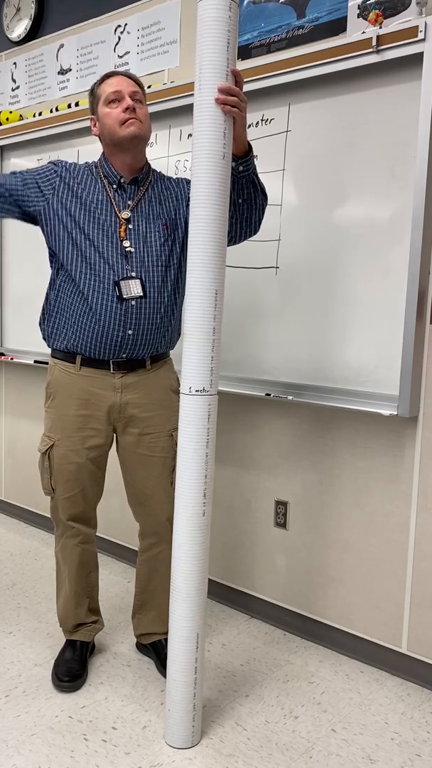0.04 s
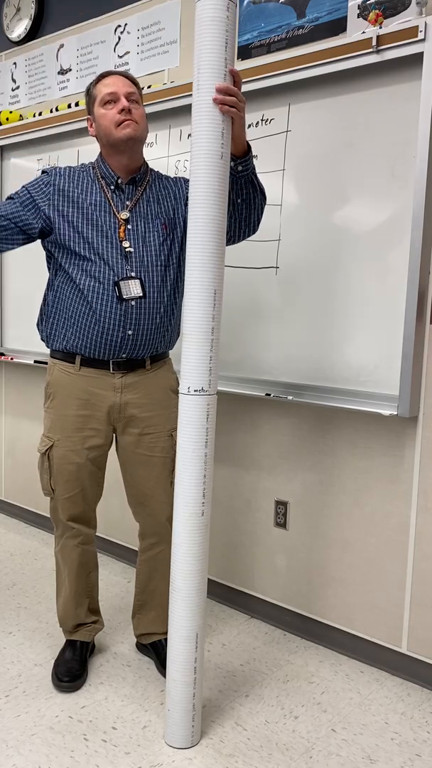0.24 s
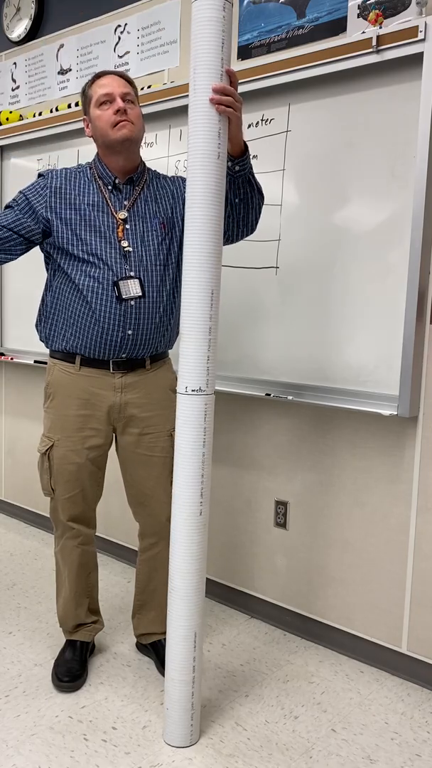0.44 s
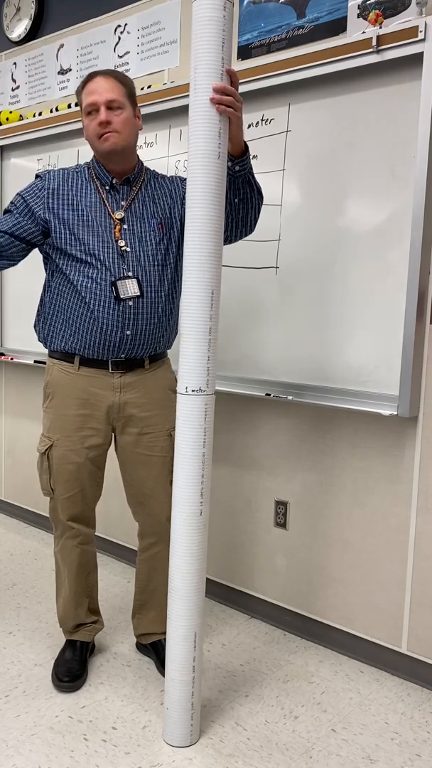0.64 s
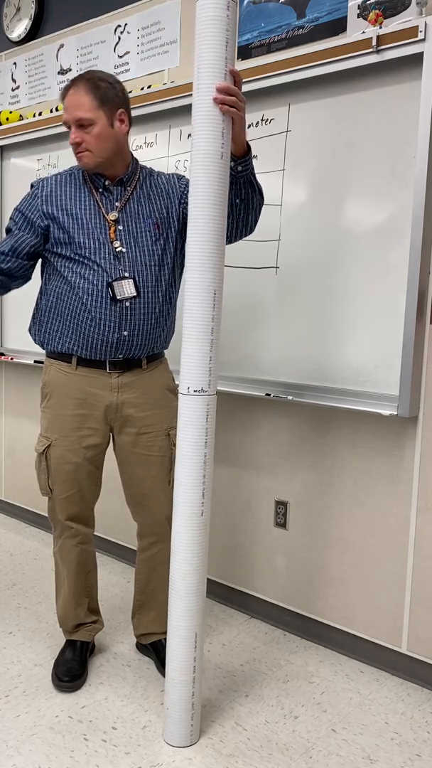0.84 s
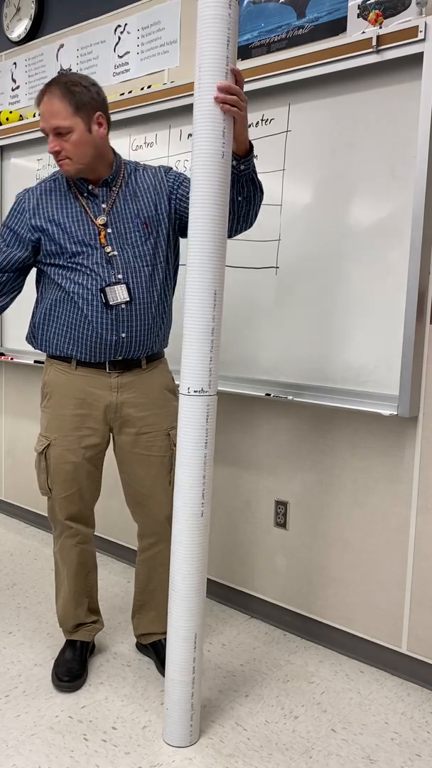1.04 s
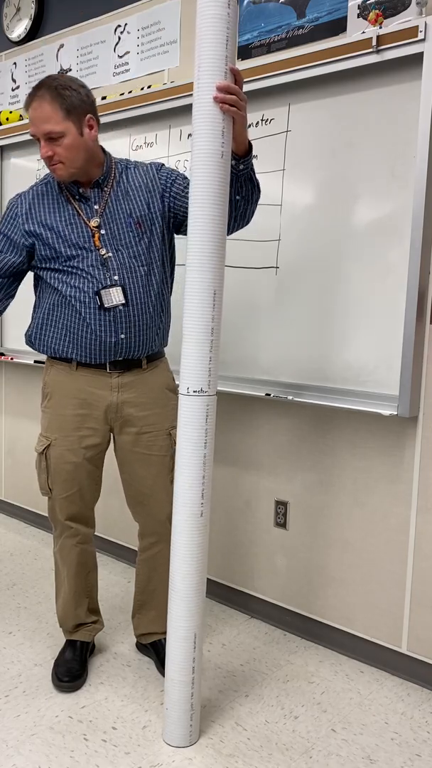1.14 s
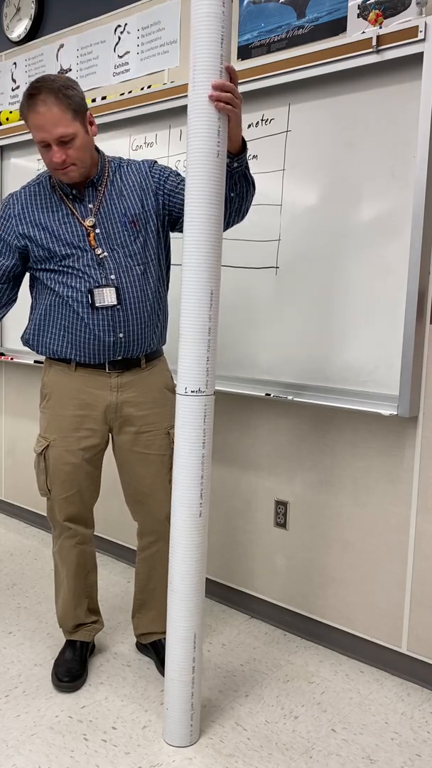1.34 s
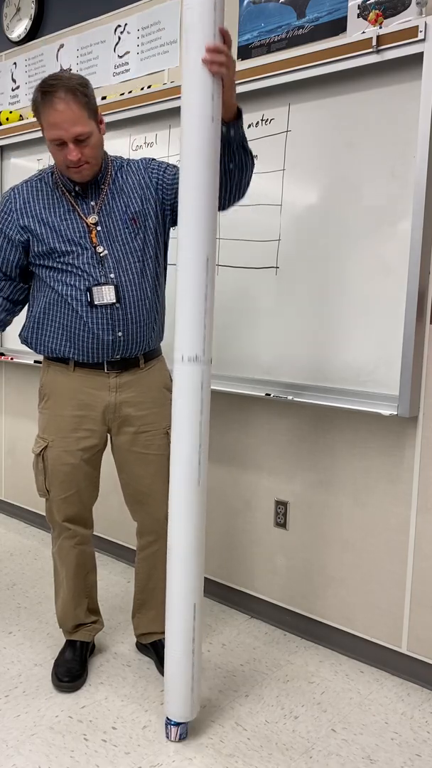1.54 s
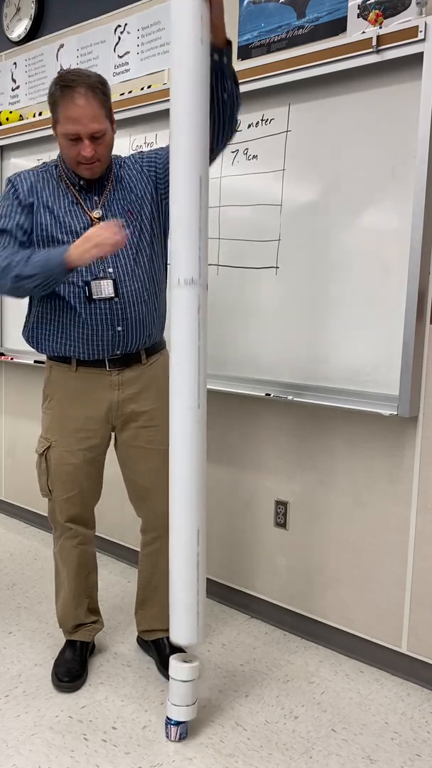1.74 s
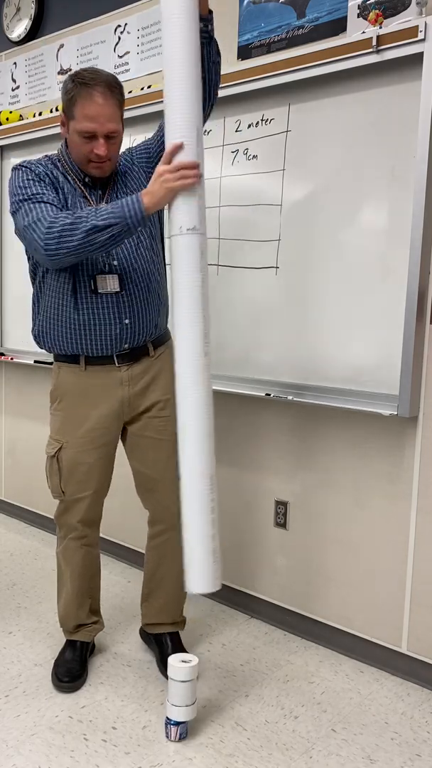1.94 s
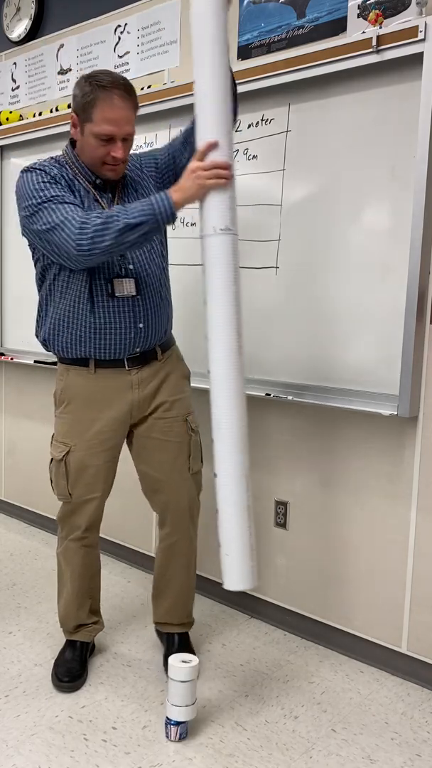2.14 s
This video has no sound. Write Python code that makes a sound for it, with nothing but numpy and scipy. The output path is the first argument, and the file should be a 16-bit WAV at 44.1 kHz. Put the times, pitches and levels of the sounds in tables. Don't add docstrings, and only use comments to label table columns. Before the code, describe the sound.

Loud crunching slam on an aluminium can after a weight's quick rattling slide down a pipe.

```python
import sys
import numpy as np
from scipy import signal
from scipy.fft import rfft, irfft, next_fast_len
from scipy.io import wavfile
from scipy.ndimage import uniform_filter1d

SR = 44100
rng = np.random.default_rng(int(sys.argv[2]) if len(sys.argv) > 2 else 0)


def voltage_ratio(level):
    return 10 ** (np.asarray(level, float) / 20)


def store_wav(level_fs):
    pcm = np.round(np.clip(np.atleast_2d(level_fs), -1, 1) * 32767)
    wavfile.write(sys.argv[1], SR, pcm.T.astype(np.int16))


N = 97020
SLAM_S, COLUMN_FULL_S = 0.4172, 0.31

# centre in Hz, width in Hz, level in dB.
PIPE = [(177, 430, -25), (367.7, 50, 3.5), (463, 80, 2.5), (675, 140, -7), (833, 45, -2.5),
        (1023, 51, -8.5), (1174, 53, -16.5), (1566, 180, -8.5), (1849, 140, -11)]
# centre in Hz, width in Hz, level in dB.
COLUMN = [(240, 120, -10), (380, 60, -2), (521, 50, -1), (615, 45, 6), (715, 50, 5), (1035, 60, -5),
          (1165, 50, -3), (1460, 100, -11), (2146, 320, -10.5)]
# start in seconds, level in dB, scrape over it in dB.
BUMPS = [(.169, -34.5, -8), (.181, -31.5, -18), (0.199, -27.5, -8.5), (.216, -34, -14.5), (.227, -26.5, -8),
         (0.253, -33, -11.5), (0.278, -35.5, 2.5), (.305, -33, -6.5), (0.3427, -28.5, -8.5),
         (0.353, -29.5, -11.5), (.363, -32, -11), (.372, -31, -3.5)]
# frequency in Hz, level in dB per Hz.
GROAN = [(35, -39.5), (120, 13), (190, 15), (400, -62)]


def unit(x):
    return x / np.sqrt(np.mean(x ** 2) + 1e-20)


def along(points, hz):
    f, v = np.transpose(points)
    return np.interp(np.log(hz + 1), np.log(f + 1), v)


def filtered(x, response):
    m = next_fast_len(N + SR // 2)
    return irfft(rfft(x, m) * response(np.fft.rfftfreq(m, 1 / SR)), m)[..., :N]


def noise(spectrum):
    return unit(filtered(rng.standard_normal(N), lambda hz: voltage_ratio(along(spectrum, hz))))


def grit(rate):
    return unit((rng.random(N) < rate / SR) * rng.standard_normal(N))


def resonant(x, peaks):
    def response(f):
        total = 0
        for k, (centre, width, db) in enumerate(peaks):
            band = 1j * f * width
            total = total + (-1) ** k * voltage_ratio(db) * band / (centre ** 2 - f ** 2 + band)
        return total
    return unit(filtered(x, response))


def fall(s, rise, t60):
    t = np.clip(np.arange(N) / SR - s, 0, None)
    return (1 - np.exp(-t / rise)) * voltage_ratio(-60 * t / t60)


def ring(s, modes, scatter_db):
    t = np.clip(np.arange(N) / SR - s, 0, None)
    out = 0
    for hz, db, t60 in modes:
        level = voltage_ratio(db + scatter_db * rng.standard_normal() - 60 * t / t60)
        out = out + level * np.sin(2 * np.pi * hz * t)
    return out


def paired(a, alike):
    turn = lambda hz: np.arccos(np.clip(along(alike, hz), -1, 1)) / 2
    mid, side = filtered(a, lambda hz: np.array([np.cos(turn(hz)), np.sin(turn(hz))]))
    return np.array([mid + side, mid - side])


def wall_strikes():
    out = 0
    for s, db, _ in BUMPS:
        peaks = PIPE if s < COLUMN_FULL_S else COLUMN
        modes = [(hz, level, np.log(1000) / np.pi / width) for hz, width, level in peaks]
        out = out + voltage_ratio(db) * ring(s, modes, scatter_db=2) * fall(s, 0.001, 1.95)
    return out


def rim_hiss():
    # start in seconds, level in dB, rise in seconds, t60 in seconds.
    drags = [
        (.226, -42.5, .006, 0.14),
        (0.311, -32.5, 0.005, .12),
        (.37, -47, .004, .07),
        (.398, -43, .003, 0.046),
    ]
    # frequency in Hz, level in dB per Hz.
    color = [(2500, -29), (3800, -5.5), (5000, 3), (6300, -8), (10000, -16.5), (15500, -20), (16600, -57.5)]
    return noise(color) * sum(voltage_ratio(db) * fall(s, rise, t60) for s, db, rise, t60 in drags)


def slide():
    # time in seconds, rattle level in dB, scrape over it in dB.
    path = [
        (0.165, -46, -4.5),
        (0.174, -30.5, -7.5),
        (.27, -31.5, -2.5),
        (.285, -34, 1),
        (.32, -27, 0.5),
        (.36, -28, -5),
        (0.379, -28, -2.5),
        (0.405, -28, 1),
        (0.416, -17, -0.5),
    ]
    # start in seconds, level in dB, rise in seconds, t60 in seconds, scrape over it in dB.
    nudges = [
        (-.03, -51.5, 0.0034, 0.38, -0.5),
        (0.035, -40, 0.003, 0.19, -2.5),
        (0.052, -33.5, .006, 0.14, -12),
        (0.111, -36, 0.0039, 0.071, -0.5),
        (0.562, -36, .002, 0.36, 0),
        (0.61, -37.5, 0.022, 0.38, -11.5),
        (0.721, -52.5, 0.015, 0.13, -26.5),
    ]
    # frequency in Hz, level in dB per Hz.
    scrape_color = [(500, -54), (1000, -2.5), (2500, -11), (5000, -18), (7400, -27), (10000, -28.5),
                    (15000, -32), (16500, -49)]
    taps_per_s, tap_spread_db, smooth_share = 1800, 1.5, 0.8
    bump_t60, between_db, bump_noise_db = 0.056, -3.5, -6
    column_from_s, falling_share, resting_share = 0.29, 0.93, 0.4

    s, level_db, bright_db = np.transpose(path)
    t = np.arange(N) / SR
    taps = (rng.random(N) < taps_per_s / SR) * rng.standard_normal(N)
    taps = taps * voltage_ratio(tap_spread_db * rng.exponential(size=N).clip(0, 2))
    drive = unit(taps) + smooth_share * rng.standard_normal(N)

    low = voltage_ratio(np.interp(t, s, level_db) + between_db) * (t > s[0]) * (t < s[-1])
    high = low * voltage_ratio(np.interp(t, s, bright_db))
    for at, db, scrape_db in BUMPS:
        low = low + voltage_ratio(bump_noise_db + db) * fall(at, 0.0027, bump_t60)
        high = high + voltage_ratio(db + scrape_db) * fall(at, 0.002, bump_t60)
    for at, db, rise, t60, scrape_db in nudges:
        push = voltage_ratio(db) * fall(at, rise, t60)
        low = low + push
        high = high + voltage_ratio(scrape_db) * push

    most = np.where(t < SLAM_S, falling_share, resting_share)
    late = np.clip((t - column_from_s) / (COLUMN_FULL_S - column_from_s), 0, most)
    body = np.sqrt(1 - late) * resonant(drive, PIPE) + np.sqrt(late) * resonant(drive, COLUMN)
    roughness = np.sqrt(np.abs(uniform_filter1d(drive ** 2, size=220)))
    scrape = unit(noise(scrape_color) * roughness)
    return wall_strikes() + low * body + rim_hiss() + high * scrape


def slam():
    # frequency in Hz, level in dB, t60 in seconds.
    body_modes = [(55, -16.5, 0.059), (78.6, -4.5, 0.097), (315, 3, 0.04), (365, -6, 0.07),
                  (470.4, -10, 0.15), (520, -7, 0.22), (615, 7, .05), (815, -16, .04), (1040, -11, .07),
                  (1220, -11, .07), (1556, -14, .08), (1730, -11, .06)]
    # frequency in Hz, level in dB per Hz.
    crack_color = [(500, -39.5), (1200, -4), (2000, 1.5), (4300, -2), (6000, -3), (11000, -5), (15500, -12),
                   (16600, -45)]
    # frequency in Hz, level in dB per Hz.
    fold_color = [(120, -49.5), (300, -8), (600, -6.5), (2000, -17), (5500, -24), (11000, -28),
                  (15500, -31), (16600, -62)]
    touch_color = [(300, -55.0), (1200, 9), (3000, -6.5), (7000, -50.0)]  # Hz, dB per Hz
    body_lag_s = 0.0026

    touch = voltage_ratio(-21) * noise(touch_color) * fall(0.409, 0.00099, 0.091)
    crack = voltage_ratio(3) * noise(crack_color) * fall(SLAM_S, 0.0009, 0.008)
    fold = voltage_ratio(-12) * noise(fold_color) * fall(SLAM_S, 0.0011, 0.17)
    body = 0.31 * ring(SLAM_S + body_lag_s, body_modes, scatter_db=0.5)
    rock = voltage_ratio(-38.5) * noise(GROAN) * fall(0.44, 0.02, 0.84)
    return touch + rock + voltage_ratio(-3.5) * (body + crack + fold)


def knocks():
    # start in seconds, level in dB, pitch in Hz, push in seconds, t60 in seconds.
    pushes = [(0, -43, 357, 0.0016, 0.18), (.117, -36, 623, 0.0065, 0.053),
              (.117, -36.5, 346, 0.0047, 0.12), (0.115, -46.5, 982, 0.0044, 0.07),
              (.655, -32, 323.8, .006, 0.078), (.765, -40.5, 580, 0.01, 0.054),
              (.595, -39.5, 586, 0.018, 0.073), (.62, -37.5, 447.3, 0.018, 0.075),
              (.68, -40, 551.4, .02, 0.12), (.69, -42, 137.8, 0.021, 0.087),
              (1.198, -40, 290.5, 0.0031, 0.023), (1.23, -39, 169.4, 0.015, 0.046),
              (1.292, -41, 173.2, 0.016, 0.059), (1.497, -40.5, 433.3, 0.014, 0.056),
              (1.636, -45.5, 347, 0.01, 0.092), (1.709, -50, 153.3, 0.016, 0.2),
              (1.733, -33.5, 359, 0.044, 0.028), (1.962, -54.5, 362.5, 0.014, 0.12)]
    after_db, after_t60 = -7, 0.55
    t = np.arange(N) / SR
    out = 0
    for s, db, hz, push, t60 in pushes:
        after = np.clip(t - s - push, 0, None)
        swell = np.clip((t - s) / push, 0, 1) ** 0.24
        decay = voltage_ratio(-60 * after / t60) + voltage_ratio(after_db - 60 * after / after_t60)
        out = out + voltage_ratio(db) * swell * decay * np.sin(2 * np.pi * hz * (t - s))
    return out


def steel():
    # start in seconds, level in dB, rise in seconds.
    hits = [
        (1.186, -50, .006),
        (1.1958, -21, .002),
        (1.241, -36, .001),
        (1.2625, -29, .002),
        (1.325, -37, .002),
        (1.373, -47, .002),
    ]
    # frequency in Hz, level in dB, t60 in seconds.
    modes = [(2086, -7, 0.12), (2234, -8, 0.2), (2560, -6, 0.12), (3170, -2, 0.36), (3245, -2, 0.42),
             (3520, -7, .09), (4520, -11, .08), (4915, -2, 0.12), (5028, 0, .12), (5500, -8, 0.06),
             (5950, -11, .07), (6970, -6, 0.07), (9290, -4, 0.09), (11550, -10, 0.11)]
    # frequency in Hz, level in dB per Hz.
    loose_color = [(400, -24.5), (900, -7), (2500, -12.5), (5000, -11.5), (6500, -10), (9500, -31),
                   (12500, -42), (14500, -69.5)]
    split = 0.00583
    chatter_per_s, chatter_width_hz = 600, 70
    chatter_peaks = [(hz, chatter_width_hz, level) for hz, level, _ in modes]
    out = 0
    for s, db, rise in hits:
        lines = []
        for hz, level, t60 in modes:
            lines += [(hz * (1 + split * r), level, t60) for r in rng.uniform(-1.12, 1, size=3)]
        clink = 0.14 * ring(s, lines, scatter_db=0.5) * fall(s, rise, 2.4)
        tick_and_jangle = voltage_ratio(-6.5) * fall(s, rise, 0.019) + voltage_ratio(-17) * fall(s, 0.0035, 0.4)
        chatter = voltage_ratio(-17) * resonant(grit(chatter_per_s), chatter_peaks) * fall(s, 0.0028, 0.3)
        out = out + voltage_ratio(db) * (clink + noise(loose_color) * tick_and_jangle + chatter)
    return out


def handling():
    # start in seconds, level in dB, rise in seconds, t60 in seconds.
    rubs = [
        (1.43, -67, 0.062, 1.8),
        (1.488, -50.5, 0.0014, 0.58),
        (1.635, -44, 0.0009, 0.18),
        (1.707, -42, 0.0013, 0.23),
        (1.768, -37, 0.0019, 0.073),
        (1.785, -47.5, 0.00079, 0.14),
        (1.948, -48, 0.012, 0.76),
        (1.6, -50.5, 0.0018, 0.2),
        (1.799, -65.5, 0.13, 3.7),
    ]
    dullness = [0.73, 1, 0.97, 0.75, 0.2, 0.63, 0.2, 0.91, 0.11]
    # frequency in Hz, level in dB per Hz.
    bright_color = [(500, -47.5), (1000, -24), (4000, -18.5), (8000, -26), (12000, -22), (15800, -26),
                    (16600, -52.5)]
    dull_color = [(70, -38), (130, -2), (350, -6), (1200, -12.5), (4500, -20.5), (8000, -37.5)]
    slips_per_s, slip_depth = 480, 0.31
    slip = 1 + slip_depth * np.sqrt(np.abs(uniform_filter1d(grit(slips_per_s) ** 2, size=130)))
    out = 0
    for (s, db, rise, t60), dull in zip(rubs, dullness):
        skin = dull * noise(dull_color) + (1 - dull) * noise(bright_color)
        out = out + voltage_ratio(db) * fall(s, rise, t60) * skin
    return unit(slip) * out


def lift():
    # time in seconds, level in dB, air pitch in Hz.
    path = [
        (1.459, -60, 450),
        (1.52, -56.5, 544),
        (1.601, -54.5, 750),
        (1.66, -53, 1061),
        (1.701, -57, 1220),
        (1.74, -96.5, 1240),
    ]
    width_hz, groan_db = 320, 3
    s, level_db, hz = np.transpose(path)
    t = np.arange(N) / SR
    slow = unit(filtered(rng.standard_normal(N), lambda f: 1 / (1 + (2 * f / width_hz) ** 2)))
    hoot = slow * np.sin(2 * np.pi * np.cumsum(np.interp(t, s, hz)) / SR)
    level = voltage_ratio(np.interp(t, s, level_db, left=-120, right=-120))
    return level * (hoot + voltage_ratio(groan_db) * noise(GROAN))


def room(x, share):
    # frequency in Hz, t60 in seconds.
    decay = [(40, 0.16), (150, 1.18), (450, 0.97), (1500, 0.64), (5000, 0.48), (12000, 0.24)]
    # frequency in Hz, left-right likeness.
    alike = [(100, 1), (400, 0.66), (1200, 0.058), (3000, 0.43), (6000, 0.93), (12000, 1)]
    delay_s = 0.008
    hz, t, z = signal.stft(rng.standard_normal((2, SR)), SR, nperseg=256)
    fading = voltage_ratio(-60 * t / (share * along(decay, hz)[:, None]))
    tail = signal.istft(z * fading, SR, nperseg=256)[1]
    tail = tail / np.linalg.norm(tail[0])
    delayed = np.pad(x, (round(delay_s * SR * share), 0))
    wet = signal.fftconvolve(delayed[None], tail, axes=1)[:, :N]
    return paired(wet, alike)


def ventilation():
    # frequency in Hz, level in dB per Hz.
    color = [(12, -28.5), (20, 1), (464, -5), (527, -13), (584, -10), (9000, -42), (11700, -72),
             (19800, -120)]
    # frequency in Hz, left-right likeness.
    alike = [(60, 1), (300, 0.89), (1500, 0.41), (6000, 1)]
    return voltage_ratio(-54.5) * paired(np.array([noise(color), noise(color)]), alike)


def scene():
    # frequency in Hz, radians by which left leads.
    lead = [(200, 0.061), (2000, 1.14), (5000, 0.53), (7400, np.pi), (10300, 2 * np.pi), (13600, 3 * np.pi),
            (16500, 4 * np.pi)]
    # frequency in Hz, left over right in dB.
    lean = [(100, -0.5), (600, -2), (4000, 0)]
    near = slide() + slam() + steel() + handling() + lift()
    soft = knocks()
    near_wall = voltage_ratio(-11) * room(near, 0.08)
    far_walls = voltage_ratio(-11) * room(near + voltage_ratio(-18) * soft, 1)

    def ports(hz):
        level = voltage_ratio(np.outer([0.5, -0.5], along(lean, hz)))
        return level * np.exp(1j * np.outer([0.5, -0.5], along(lead, hz)))
    return filtered(near + soft + near_wall + far_walls + ventilation(), ports)


def roll_off(x):
    return signal.sosfilt(signal.butter(12, 17140, fs=SR, output="sos"), x)


def record(dry):
    top, low_hz, top_hz = 0.9, 35, 16200
    soft = dry / (1 + np.abs(dry / top) ** 6) ** (1 / 6)
    mix = filtered(soft, lambda hz: hz ** 2 / (hz ** 2 + low_hz ** 2) / (1 + (hz / top_hz) ** 60))
    return roll_off(mix)


dry = scene()
out = record(dry)
store_wav(out)
```